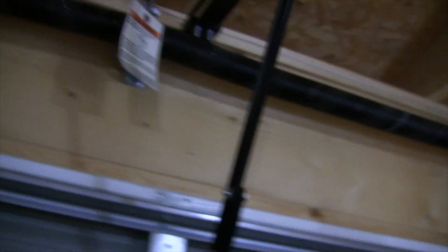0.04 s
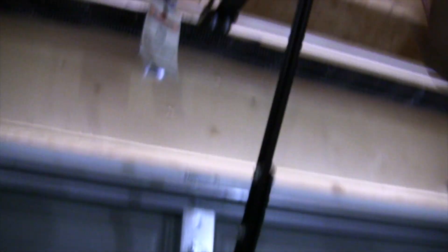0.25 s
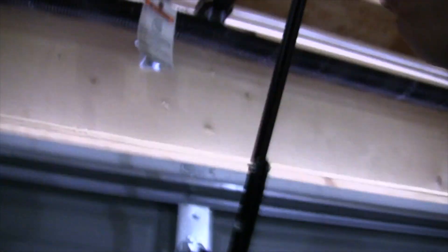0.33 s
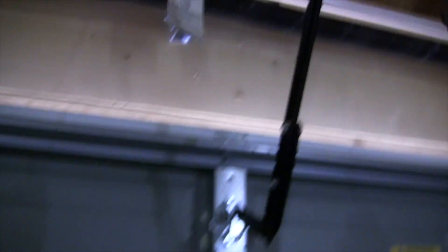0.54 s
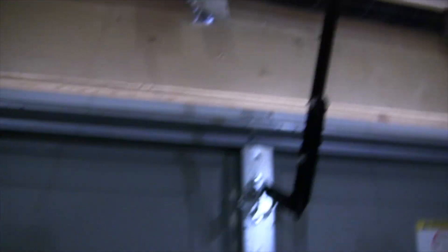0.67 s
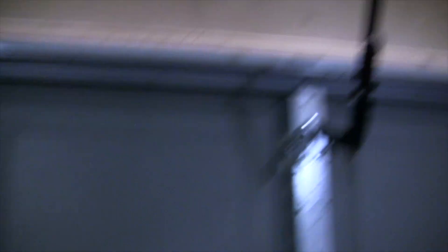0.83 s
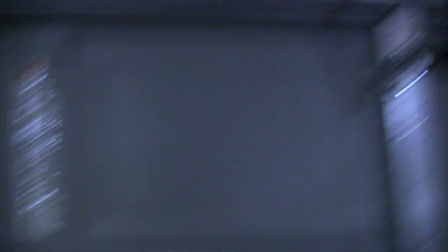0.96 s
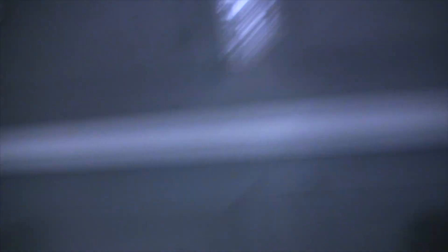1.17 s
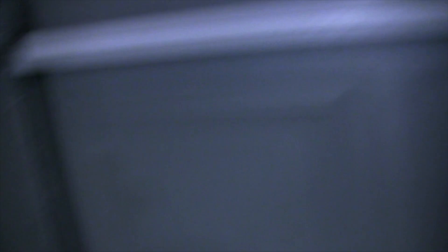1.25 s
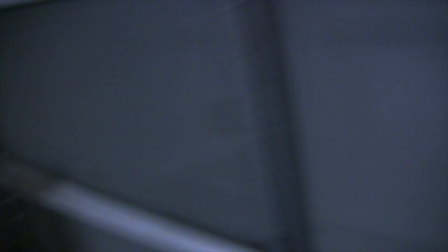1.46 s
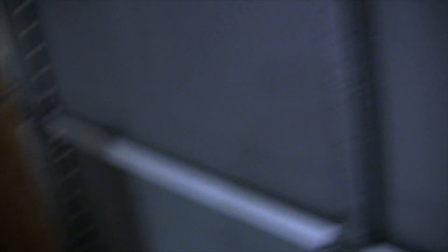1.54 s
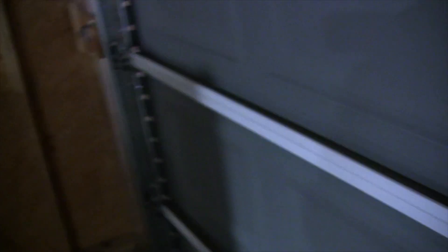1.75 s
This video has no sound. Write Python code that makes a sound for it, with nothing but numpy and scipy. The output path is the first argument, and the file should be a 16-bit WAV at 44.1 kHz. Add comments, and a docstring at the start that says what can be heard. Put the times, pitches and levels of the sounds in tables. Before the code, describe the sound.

Metal latch snaps and jangles as a garage door is released, then rumbles and settles

```python
"""Release of a garage door opener

A cord creaks taut by stick-slip over a soft hum; the latch snaps free and parts clatter as runs of
contacts exciting short modes. A small steel part rings in a few long modes; the sheet-steel door
shudders and rumbles in dense modes, then settles with a light scrape. Heard from close by in the garage."""
import sys
import numpy as np
from scipy import signal
from scipy.fft import rfft, irfft
from scipy.io import wavfile
from scipy.ndimage import uniform_filter1d

SR = 44100
rng = np.random.default_rng(int(sys.argv[2]) if len(sys.argv) > 2 else 0)


def int16_out(signal):
    """Quantize to a 16-bit WAV file."""
    q = np.round(np.clip(np.atleast_2d(signal).T, -1, 1) * 32767)
    wavfile.write(sys.argv[1], SR, q.astype(np.int16))


N = 79380  # samples, 1.8 s
TIME_S = np.arange(N) / SR

# metal-on-metal knocks: t/s, jingle level/dB, clank level/dB, duller rap level/dB, rise/s, contact length/s
KNOCKS = [(0.2229, -18.5, -10.5, -23, 0.002, 0.017), (0.291, -16.5, -16, -26, .0015, .004),
          (0.3004, -18.5, -22, -37, 0.0008, 0.0022), (0.438, -20, -19, -19.5, .001, 0.0043),
          (0.4552, -17, -21, -19, 0.0013, 0.0065), (0.5143, -22, -15.5, -13, 0.0011, 0.0064),
          (0.5898, -17.5, -17.5, -16, 0.00039, 0.0034), (0.6582, -18.5, -16, -19, 0.0019, 0.0053),
          (0.777, -21.5, -23, -13.5, 0.0018, 0.0036), (0.886, -35, -32, -34, .001, .006),
          (0.916, -39, -30, -33, 0.0027, 0.0067), (0.955, -56, -28, -24, 0.0062, 0.025),
          (1.094, -39, -25, -42, 0.00065, 0.0053), (1.347, -46, -28, -30.5, 0.011, 0.021),
          (1.413, -57, -36, -40, 0.0013, .003), (1.548, -51.5, -45.5, -40.5, 0.0053, 0.012)]
RELEASE_S = KNOCKS[0][0]
FIRST_BLOW_DB, FIRST_BLOW_T60_S = 0.5, 0.0081  # relative to the held contact


def bursts(levels_db, t60):
    """Superposed powers: each knock is a hard first blow plus a contact that is held, then decays."""
    power = np.zeros(N)
    for (start_s, *_, rise_s, length_s), level_db in zip(KNOCKS, levels_db):
        since = TIME_S - start_s
        rise = np.clip(since / rise_s + 1, 0, 1)  # full at the knock time
        blow = amp(FIRST_BLOW_DB - 60 * np.maximum(since, 0) / FIRST_BLOW_T60_S)
        held = amp(level_db - 60 * np.maximum(since - length_s, 0) / t60)
        power += (rise * held) ** 2 * (1 + blow ** 2)
    return np.sqrt(power)


# mode spectra of the small bright parts, the trolley casting and the rail: f/Hz, level/dB per Hz
JINGLE = [(4500, -26), (5300, 1.5), (6200, -1.5), (7000, -8), (7700, -11.5), (9000, -8.5), (10200, -3.5),
          (12000, -5), (13300, -9), (14000, -33), (15500, -60)]
CLANK = [(1500, -22), (2500, -13), (3100, -4), (3500, 1), (3900, -1), (4400, 0.5), (4900, -3.5),
         (5400, -27), (7000, -47)]
RAP = [(700, -10), (1300, -1.5), (1800, 2.5), (2600, 0.5), (3300, -0.5), (4500, -22)]
CONTACTS_PER_S, CONTACT_SPREAD_DB = 10000, 1.5
JINGLE_T60_S, CLANK_T60_S = 0.084, 0.036  # decay of the contacts
JINGLE_RING_S, CLANK_RING_S = 0.018, 0.03  # t60 of the modes


def knocks():
    """Modal excitation: runs of contacts drive small bright parts, the trolley casting and the rail."""
    _, jingle_db, clank_db, rap_db, *_ = np.transpose(KNOCKS)

    def struck_body(levels_db, burst_t60, spectrum, ring_s, count):
        """Amplitude modulation: the burst envelope scales a run of contacts that excites the modes."""
        touches = bursts(levels_db, burst_t60) * contacts(CONTACTS_PER_S, CONTACT_SPREAD_DB)
        return scattered(touches, spectrum, ring_s, count)

    return (struck_body(jingle_db, JINGLE_T60_S, JINGLE, JINGLE_RING_S, count=90)
            + struck_body(clank_db, CLANK_T60_S, CLANK, CLANK_RING_S, count=60)
            + struck_body(rap_db, CLANK_T60_S, RAP, CLANK_RING_S, count=40))


# modes of the small steel part: f/Hz, relative level/dB, t60/s
RING = [(5448, 0, .7), (5480, -2, .7), (5528, -11, .4), (6015, -6, .1), (10180, -14, .35),
        (10420, -14, .15), (11700, -14, .1), (13400, -15, .08)]
# blows that reach it: t/s, level/dB
STRIKES = [(.2865, -33), (.2975, -24), (.35, -23), (.378, -22), (.4388, -24), (.4582, -23), (.5141, -24),
           (.5905, -22), (.6598, -21), (.7795, -24), (.86, -28)]


def ringing():
    """Free vibration: each blow sets the modes to a new level, from which they decay exponentially."""
    strike_s, strength_db = np.transpose(STRIKES)
    last = np.maximum(np.searchsorted(strike_s, TIME_S) - 1, 0)
    since = TIME_S - strike_s[last]
    chance_db = rng.normal(0, 1.5, (len(strike_s), len(RING)))  # uneven excitation of the modes
    out = np.zeros(N)
    for k, (hz, level_db, t60) in enumerate(RING):
        decay_db = strength_db[last] + level_db + chance_db[last, k] - 60 * since / t60
        envelope = uniform_filter1d(amp(decay_db) * (since > 0), size=60)  # softens the steps
        out += envelope * np.sin(2 * np.pi * (hz * TIME_S + rng.random()))
    return out


# shaking of the door: t/s, panel rattle level/dB, low boom level/dB,
# loose-hardware chatter level/dB, deepest boom level/dB
SHAKE = [(0.2, -40, -39, -43.5, -47), (0.23, -23, -35, -62, -35.5), (0.274, -27, -33, -26.5, -43),
         (0.404, -17.5, -22, -20.5, -35.5), (0.47, -22, -25, -23, -36.5), (0.538, -16.5, -22, -21, -35),
         (0.716, -20.5, -23.5, -24, -35.5), (0.738, -14, -18.5, -16, -45), (0.76, -15, -17.5, -19, -32),
         (0.822, -20, -22.5, -24.5, -34), (0.938, -22, -26, -28.5, -38), (0.966, -19.5, -24.5, -33.5, -33),
         (1.014, -22.5, -26.5, -41, -37.5), (1.166, -22.5, -26.5, -34.5, -30),
         (1.206, -25.5, -30, -46, -41), (1.232, -25, -29, -48, -36), (1.274, -30, -31, -54, -32),
         (1.332, -31.5, -32.5, -48, -41), (1.372, -25, -38, -41, -34.5), (1.402, -30.5, -33.5, -37.5, -51),
         (1.464, -36.5, -35.5, -39.5, -39), (1.594, -43.5, -41, -45.5, -42.5),
         (1.638, -59, -48.5, -57, -41), (1.718, -47.5, -54, -64, -52), (1.746, -47.5, -55, -49, -39),
         (1.8, -51, -56, -48.5, -38)]
# mode spectra of panels, whole door, its deepest part and the loose hardware: f/Hz, level/dB per Hz
PANEL = [(250, -7), (350, 4), (430, -6), (540, -4), (720, 12.5), (950, 4.5), (1300, 2.5), (1700, 1.5),
         (2100, -5.5), (3200, -12), (4500, -17), (7000, -47)]
BOOM = [(65, -38), (110, -7), (167, -5), (206, 7.5), (330, 0), (365, -2.5), (426, -10), (550, -8.5),
        (720, -12), (1210, -120)]
THUD = [(13, -53), (22, -23), (32, -18), (69, -12.5), (103, -8), (129, -7), (170, -11.5), (220, -21),
        (370, -120)]
CHATTER = [(1290, -9), (2200, 0), (2870, 1.5), (3990, 1), (5630, -3), (6400, -12), (12800, -20),
           (14400, -69), (15000, -67)]
PANEL_T60_S, BOOM_T60_S, CHATTER_T60_S = 0.11, 0.23, 0.034
ROLLER_BUMPS_PER_S, BUMP_SPREAD_DB = 1500, 2.5
CHATTER_PER_S, CHATTER_SPREAD_DB = 8000, 3.4


def door():
    """Forced plate vibration: roller bumps shake panels and whole door; hinges and bolts chatter."""
    panel_db, boom_db, chatter_db, thud_db = in_time(SHAKE)
    sheet = np.zeros(N)
    for level_db, spectrum, t60 in ((panel_db, PANEL, PANEL_T60_S),
                                    (boom_db, BOOM, BOOM_T60_S),
                                    (thud_db, THUD, BOOM_T60_S)):
        bumps = contacts(ROLLER_BUMPS_PER_S, BUMP_SPREAD_DB)
        sheet += amp(level_db) * rms_one(body(bumps, spectrum, t60, count=220))
    taps = contacts(CHATTER_PER_S, CHATTER_SPREAD_DB)
    chatter = amp(chatter_db) * rms_one(scattered(taps, CHATTER, CHATTER_T60_S, count=110))
    return (sheet + chatter) * (TIME_S > RELEASE_S)


# cord pulled taut: t/s, level/dB
PULL = [(0.0, -47), (0.072, -53), (0.076, -53), (0.118, -37), (0.148, -41), (0.215, -35.5)]
# resonances of the creak: f/Hz, width/Hz, relative level/dB
CREAK = [(1204, 360, 2), (1690, 530, 4.5), (2770, 250, -1), (3220, 250, -1), (4000, 440, -2.5),
         (5040, 720, -6)]
# two soft tones before the release: f/Hz, width/Hz, level/dB
HUM = [(455, 32, -50.5), (1565, 39, -46)]
SLIPS_PER_S, SLIP_SPREAD_DB = 2300, 1.4


def cord():
    """Stick-slip friction: slips of cord and lever excite resonances, over a hum, until the release."""
    slips = contacts(SLIPS_PER_S, SLIP_SPREAD_DB)
    noise = rng.standard_normal(N)
    creak, hum = np.zeros(N), np.zeros(N)
    for k, (hz, width_hz, level_db) in enumerate(CREAK):
        creak += (-1) ** k * amp(level_db) * resonance(slips, hz, width_hz)
    for hz, width_hz, level_db in HUM:
        narrow = resonance(noise, hz, width_hz)
        hum += amp(level_db) * rms_one(resonance(narrow, hz, 3 * width_hz))
    pull_db = in_time(PULL)[0]
    return (amp(pull_db) * rms_one(creak) + hum) * (TIME_S < RELEASE_S)


# mode spectrum of a last light scrape as the door comes to rest: f/Hz, level/dB per Hz
SCRAPE = [(2000, -27), (2750, 0), (3100, 5.5), (3500, -11), (4100, -9), (4600, 1), (5200, -4), (5800, -13),
          (6400, -17.5), (9000, -31), (13000, -25)]
SCRAPE_S, SCRAPE_DB, SCRAPE_T60_S = 1.6895, -38, 0.29


def scrape():
    """Sliding friction: dense contacts start at once and fade, ringing mainly in two bands."""
    since = TIME_S - SCRAPE_S
    envelope = (since > 0) * amp(SCRAPE_DB - 60 * np.maximum(since, 0) / SCRAPE_T60_S)
    rub = envelope * contacts(CONTACTS_PER_S, 2.0)
    return scattered(rub, SCRAPE, CLANK_RING_S, count=60)


GARAGE_T60_S, GARAGE_TREBLE_T60_S, GARAGE_DB = 0.18, 0.36, -4


def garage(x):
    """Diffuse reverberation: dense reflections, split near 3500 Hz, the treble dying more slowly."""
    t = np.arange(SR) / SR
    noise = rng.standard_normal(SR)
    dull = signal.sosfilt(signal.butter(2, 3500, fs=SR, output="sos"), noise)
    tail = dull * amp(-60 * t / GARAGE_T60_S) + (noise - dull) * amp(-60 * t / GARAGE_TREBLE_T60_S)
    tail = tail * (t > .004) / np.sqrt(np.sum(tail ** 2))  # no reflection in the first 4 ms
    return signal.fftconvolve(x, tail)[:N]


# stereo width: f/Hz, side minus mid level/dB
WIDTH = [(60, -11), (110, -18), (200, -17), (380, -18), (700, -15.5), (1290, -23.5), (2380, -30.5),
         (4400, -18), (8120, -2), (15000, -17.5)]
SIDE_T60_S = 0.16


def side_reflections(mid):
    """Decorrelation: a decaying noise response turns the mid signal into a side signal."""
    t = np.arange(SR // 2) / SR
    walls = rng.standard_normal(SR // 2) * amp(-60 * t / SIDE_T60_S)
    walls = walls / np.sqrt(np.sum(walls ** 2))
    return coloured(signal.fftconvolve(mid, walls)[:N], WIDTH)


# spectrum of the steady noise floor: f/Hz, relative level/dB
FLOOR = [(25, -35), (60, -5.5), (130, -2.5), (400, 1), (1200, -7), (2500, -8.5), (5000, -17), (8000, -46),
         (15500, -20)]
FLOOR_DB = -44


def noise_floor():
    """Stationary noise: Gaussian noise shaped by a fixed spectrum."""
    return amp(FLOOR_DB) * rms_one(coloured(rng.standard_normal(N), FLOOR))


def amp(db):
    """Level definition: 20 dB is a factor of ten in amplitude."""
    return 10 ** (np.asarray(db, float) / 20)


def rms_one(x):
    """Normalisation to unit root mean square."""
    return x / np.sqrt(np.mean(x ** 2) + 1e-20)


def in_time(rows):
    """Linear interpolation of each column over time."""
    s, *columns = np.transpose(rows)
    return [np.interp(TIME_S, s, column) for column in columns]


def at_hz(points, hz):
    """Interpolation of level over logarithmic frequency."""
    point_hz, level_db = np.transpose(points)
    return np.interp(np.log(hz), np.log(point_hz), level_db)


def contacts(per_s, spread_db):
    """Random impulse process: tiny impacts of uneven size and either sign; rms 1."""
    sizes = amp(spread_db * np.minimum(rng.exponential(1, N), 4)) * rng.choice([-1, 1], N)
    return rms_one(sizes * (rng.random(N) < per_s / SR))


def body(x, spectrum, t60, count):
    """Modal superposition: dense modes at uneven pitches, weighted by a spectrum; unit power gain."""
    t = np.arange(int(min(t60, .5) * SR)) / SR
    low, high = spectrum[0][0], spectrum[-1][0]
    hz = low * (high / low) ** ((np.arange(count) + .5 * rng.random(count)) / count)
    # sqrt(hz) offsets the logarithmic spacing of the modes
    gains = amp(at_hz(spectrum, hz)) * np.sqrt(hz) * (-1) ** np.arange(count)
    response = (gains @ np.sin(2 * np.pi * np.outer(hz, t))) * amp(-60 * t / t60)
    return signal.fftconvolve(x, response / np.sqrt(np.sum(response ** 2)))[:N]


def scattered(x, spectrum, t60, count):
    """Local modal excitation: each contact rings one of many short modes; unit power gain."""
    low, high = spectrum[0][0], spectrum[-1][0]
    hz = np.geomspace(low, high, count) * amp(rng.normal(0, 0.16, count))  # uneven pitches
    gains = amp(at_hz(spectrum, hz)) * np.sqrt(hz)
    dealt = rng.integers(0, count, N)  # the mode each sample falls on
    r = amp(-60 / (t60 * SR))
    out = np.zeros(N)
    for k, (gain, w) in enumerate(zip(gains, 2 * np.pi * hz / SR)):
        share = x * (dealt == k) + 1e-18
        out += gain * signal.lfilter([0, np.sin(w)], [1, -2 * r * np.cos(w), r * r], share)
    return out * np.sqrt(2 * (1 - r * r) / np.mean(gains ** 2))


def resonance(x, hz, width_hz):
    """Damped oscillator: a two-pole band-pass whose bandwidth sets the damping."""
    r = np.exp(-np.pi * width_hz / SR)
    poles = [1, -2 * r * np.cos(2 * np.pi * hz / SR), r * r]
    return signal.lfilter([(1 - r * r) / 2, 0, (r * r - 1) / 2], poles, x)


def coloured(x, spectrum):
    """Linear filtering: multiplies the Fourier spectrum by a given level curve."""
    hz = np.maximum(np.fft.rfftfreq(N, 1 / SR), 1)
    return irfft(rfft(x) * amp(at_hz(spectrum, hz)), N)


def scene():
    """Superposition of all sources; left is mid plus side, right is mid minus side."""
    struck = knocks() + scrape()
    reflected = amp(GARAGE_DB) * garage(struck)
    mid = struck + reflected + ringing() + door() + cord() + noise_floor()
    return mid + side_reflections(mid) * [[1], [-1]]


MIC_ROLLOFF_HZ, CUTOFF_HZ = 13700, 15700


def record(dry):
    """Saturation and band-limiting: peaks are rounded, the microphone rolls off, the top is cut."""
    rounded = 1.259 * np.tanh(dry / 1.344)
    mic = signal.sosfilt(signal.butter(6, MIC_ROLLOFF_HZ, fs=SR, output="sos"), rounded)
    return signal.sosfilt(signal.cheby2(12, 70, CUTOFF_HZ, fs=SR, output="sos"), mic)


dry = scene()
out = record(dry)
int16_out(out)
```